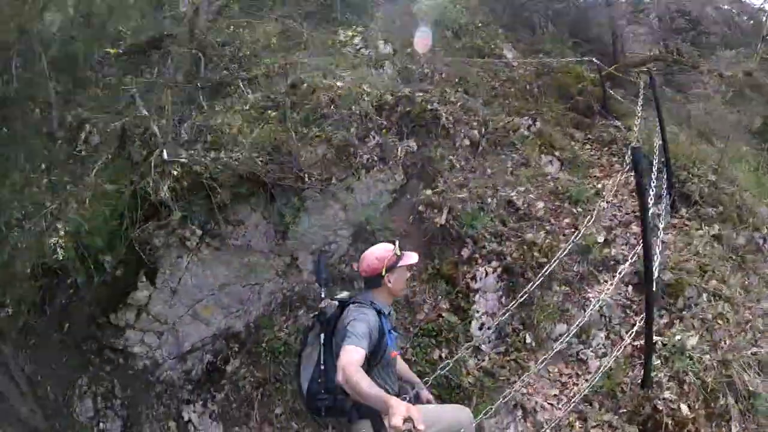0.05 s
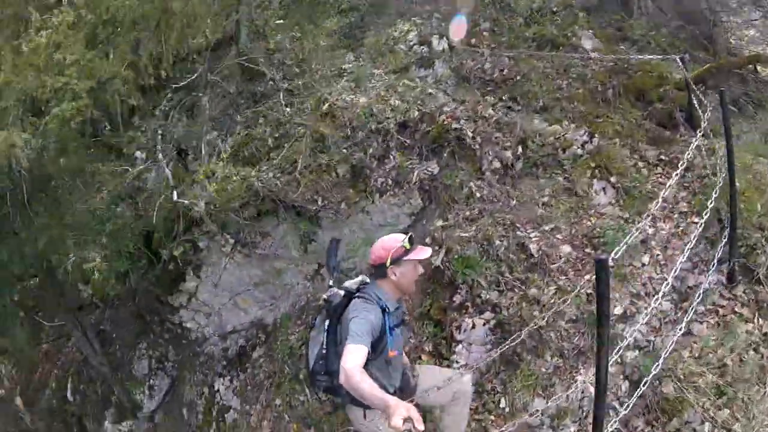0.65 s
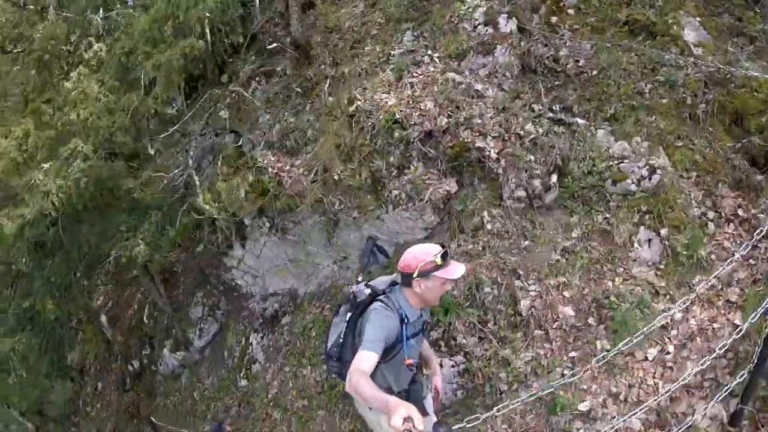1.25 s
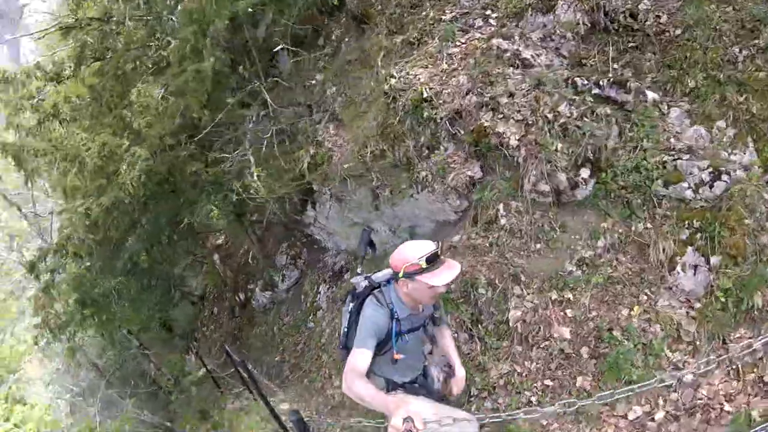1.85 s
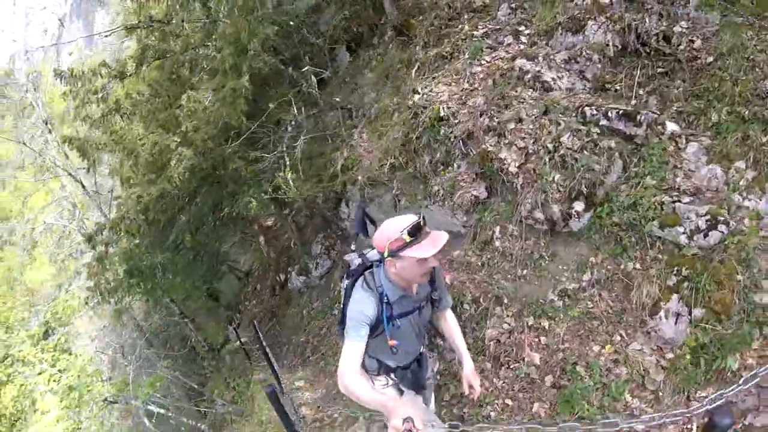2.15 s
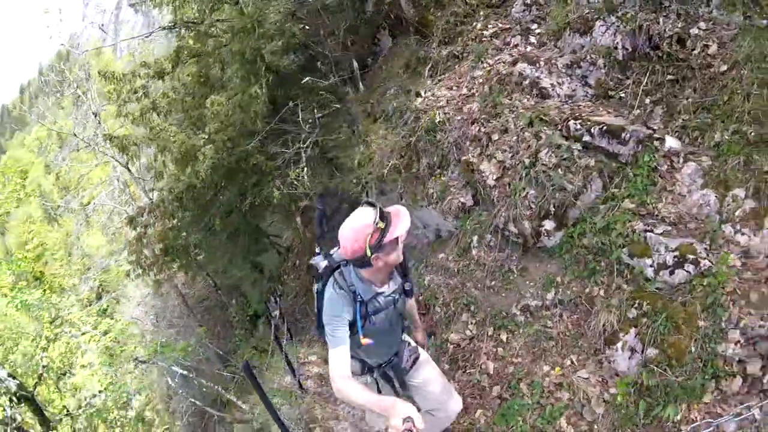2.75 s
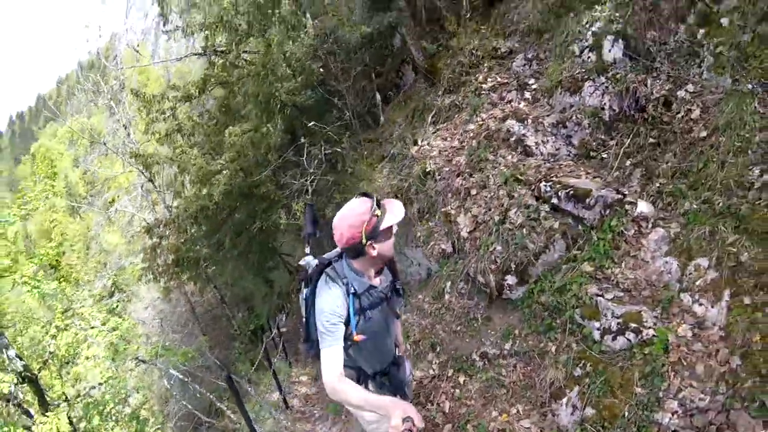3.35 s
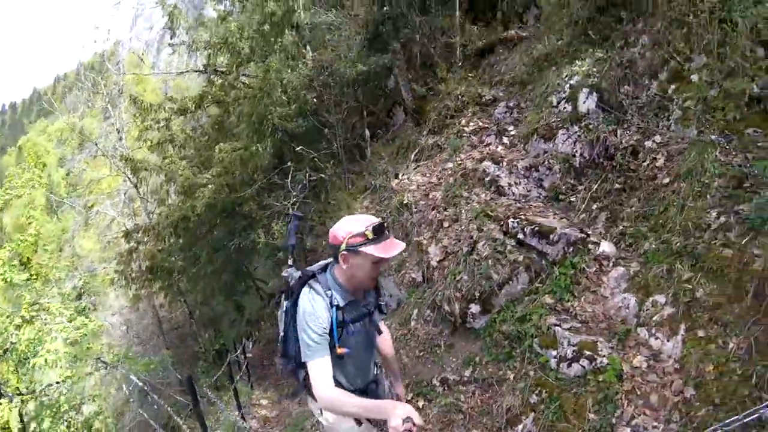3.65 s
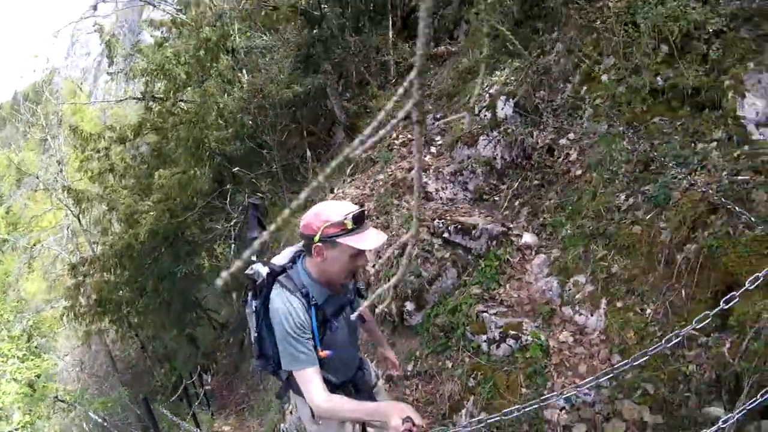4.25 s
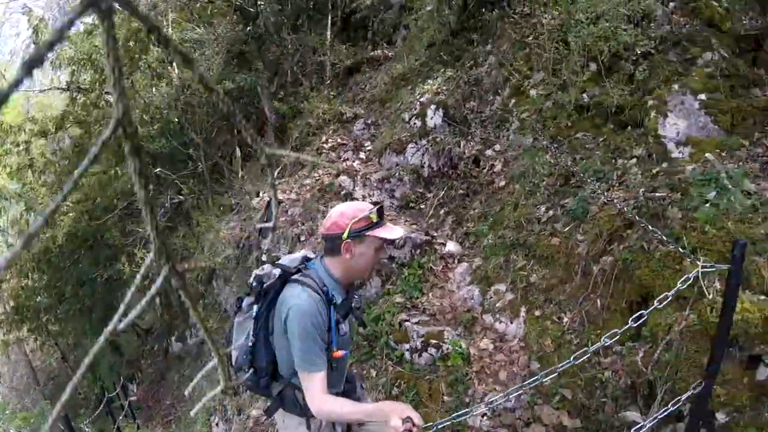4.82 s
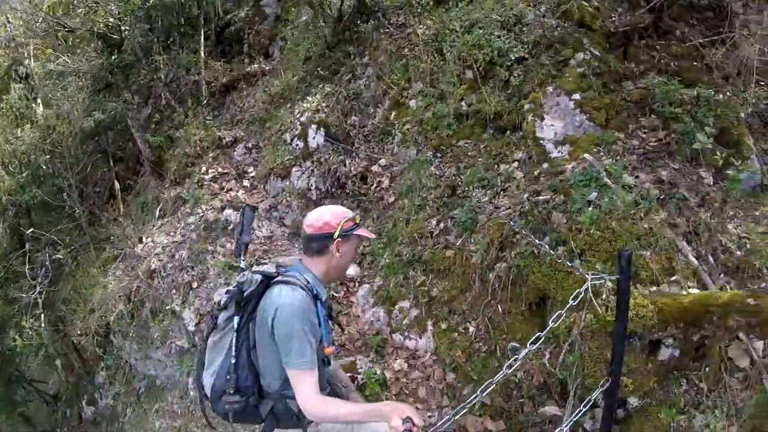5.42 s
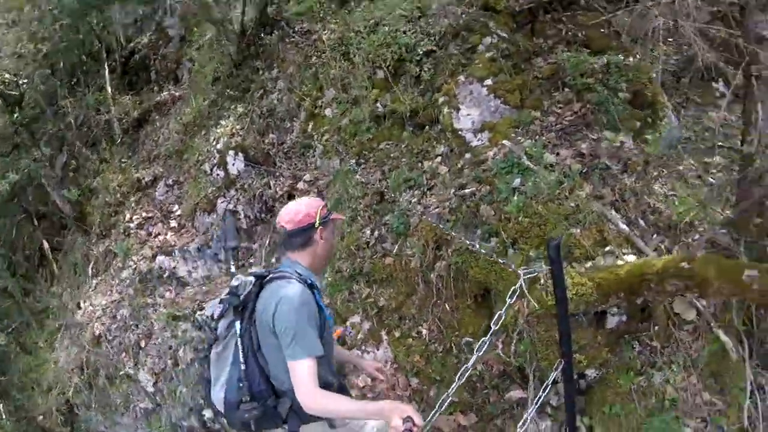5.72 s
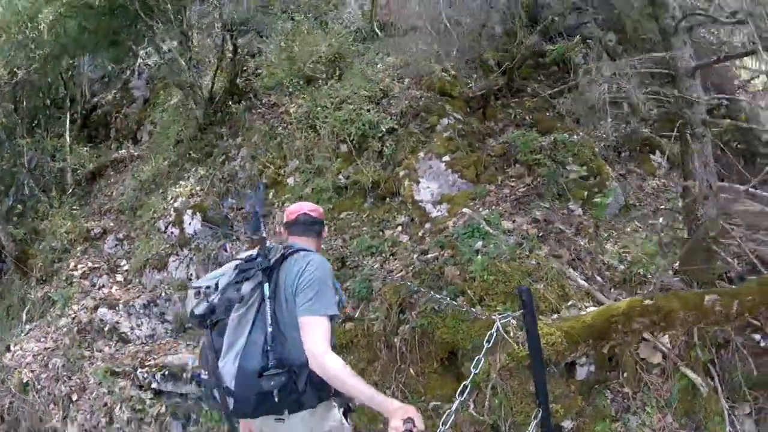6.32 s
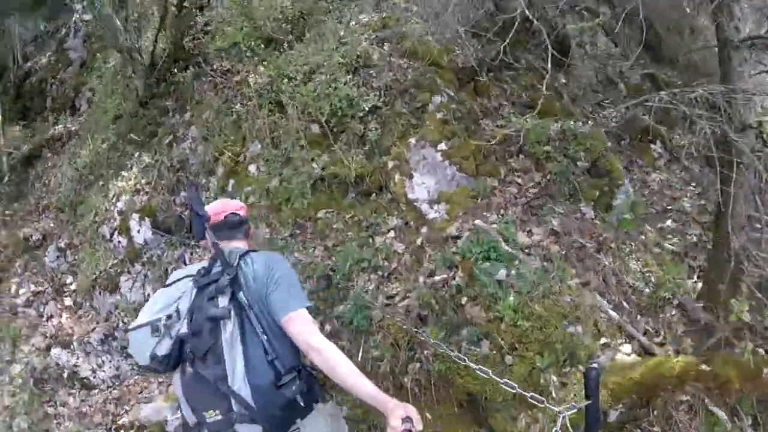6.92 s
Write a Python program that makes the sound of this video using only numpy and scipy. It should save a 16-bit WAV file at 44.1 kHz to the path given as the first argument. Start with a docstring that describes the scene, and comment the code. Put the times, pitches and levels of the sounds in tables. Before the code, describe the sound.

A gust buffets the microphone with a low, lumpy rumble, easing after about 1 second to a light breeze. A faint, airy outdoor hiss lies underneath. Throughout, boots scuff and crunch quietly and unevenly through dry leaves on a rocky forest path, with small snaps of twigs and grit, clearest near 0.9, 1.9 and 3 seconds. From about 3.4 to 4.1 seconds, branches and gear bump the camera pole, making several dull, very close thumps. Between 4.6 and 4.9 seconds comes the loudest moment, a quick cluster of hard clacks and short scrapes, and the hiss drops away. After a quieter step or two, a bright, scraping clatter arrives from 5.8 to 6.1 seconds, followed by a single duller knock at 6.3. Another leafy step follows, and soft knocking and rubbing on the pole finish it around 7 seconds.

```python
"""A hiker walks a rocky, leaf-strewn forest path, holding a small camera out on a pole.
At first a gust buffets the microphone over the faint hiss of the valley, while boots scuff dry leaves
and snap twigs and grit. The gust eases after a second; the steps go on. From 3.35 s branches and gear
knock on the pole, whose modes ring straight into the camera: dull thumps first, then from 4.6 s hard
clacks and scrapes, a bright clatter near 6 s and a last soft knocking and rubbing near 7 s."""
import sys
import numpy as np
from scipy import signal
from scipy.fft import rfft, irfft
from scipy.io import wavfile

SR = 44100
rng = np.random.default_rng(int(sys.argv[2]) if len(sys.argv) > 2 else 0)


def wrap_up_sound(samples):
    """Save the sound to the file named by the first command line argument, as 16-bit audio."""
    columns = np.atleast_2d(samples).T
    # keep every value between -1 and 1, then stretch to whole-number steps
    tamed = np.clip(columns, -1, 1)
    steps = np.round(tamed * 32767).astype(np.int16)
    wavfile.write(sys.argv[1], SR, steps)


N = 316638
TIME = np.arange(N) / SR


def amp(db):
    """Decibels to amplitude ratio."""
    return 10 ** (np.asarray(db) / 20)


def unit(x):
    """Normalisation to rms 1."""
    return x / np.sqrt(np.mean(x ** 2) + 1e-20)


def burst(x):
    """Normalisation to the energy of 10 ms at rms 1."""
    return x / np.sqrt(np.sum(x ** 2) * 100 / SR + 1e-20)


def curve(rows):
    """Linear interpolation of (t/s, value) rows."""
    return np.interp(TIME, *np.transpose(rows))


def colour(x, spectrum):
    """Spectral shaping by (f/Hz, level/dB) rows, to rms 1."""
    hz, db = np.transpose(spectrum)
    f = np.fft.rfftfreq(len(x), 1 / SR)
    gain = amp(np.interp(np.log(f + 1), np.log(hz), db))
    return unit(irfft(rfft(x) * gain, len(x)))


def lowpass(x, hz, order=2):
    """Causal low-pass filter."""
    return signal.sosfilt(signal.butter(order, min(hz, .45 * SR), fs=SR, output="sos"), x)


def highpass(x, hz, order=2):
    """Causal high-pass filter."""
    return signal.sosfilt(signal.butter(order, hz, "high", fs=SR, output="sos"), x)


def wander(hz):
    """Low-passed Gaussian fluctuation of rms 1."""
    return unit(lowpass(rng.standard_normal(N), hz))


def add(mix, s, sound):
    """Superposition of a sound starting at time s."""
    part = mix[max(round(s * SR), 0):][:len(sound)]
    part += sound[:len(part)]


# Course of the breeze at the microphone: t/s, relative level/dB
BREEZE_LEVELS = [(0.0, -37), (0.42, -42), (0.92, -36), (1.28, -47), (2.42, -51.5), (3.54, -50), (3.7, -45),
                 (4.84, -53), (5.2, -59), (6.14, -48), (7.18, -47.5)]
# Spectrum of its turbulence: f/Hz, relative level/dB
TURBULENCE_SPECTRUM = [(10, -6), (25, -1), (45, 0.5), (80, -9.5), (130, -12.5), (200, -18.5), (300, -32.5),
                       (600, -46.5), (2000, -83.5)]
# Strongest eddies of the gust: t/s, envelope peak level/dB
GUST_EDDIES = [(.047, -22.5), (.087, -22), (.128, -23.5), (.22, -24.5), (.324, -25.5), (.497, -26.5),
               (.641, -24), (.722, -19), (.792, -22.5), (.888, -23), (.913, -18), (1.006, -25.5),
               (1.101, -27.5), (1.523, -32.5)]
def wind(offset_db=1.52, lumpy_db=2.5, gust_db=-36, gust_hz=190, gust_share=0.27,
         eddy_s=0.0025, eddies_per_s=5.1, eddy_over_db=8, shed_above_db=-44):
    """Turbulent pressure at the port: a rumble that reaches higher in gusts, and swings of single eddies."""
    level_db = curve(BREEZE_LEVELS) + offset_db
    level = amp(level_db)
    slow = colour(rng.standard_normal(N), TURBULENCE_SPECTRUM)
    fast = unit(lowpass(rng.standard_normal(N), gust_hz, order=4))
    gust = gust_share * np.minimum(level / amp(gust_db), 1)
    out = level * (slow + gust * fast) * amp(lumpy_db * wander(hz=18))
    shed = (rng.random(N) < eddies_per_s / SR) & (level_db > shed_above_db)
    lesser_eddies = zip(TIME[shed], level_db[shed] + eddy_over_db)
    t = np.arange(-SR // 40, SR // 40) / SR
    for s, db in [*GUST_EDDIES, *lesser_eddies]:
        width = eddy_s * np.exp(0.23 * rng.standard_normal())
        # the pressure swings fastest as the core of the eddy passes
        phase = 2.1 * np.arcsinh(t / width) + rng.uniform(-1.2, 1.2)
        add(out, s + t[0], amp(db) * np.cos(phase) / np.cosh(t / width / 1.5))
    return out


# Spectrum of the valley hiss through the microphone port: f/Hz, relative level/dB
HISS_SPECTRUM = [(100, 9.5), (300, 5), (600, 1.5), (1000, -1.5), (2000, -5), (4000, -11.5), (5200, -9.5),
                 (6200, -7), (6550, 0.5), (7100, -7.5), (9000, -11.5), (11000, -17), (13000, -18.5),
                 (15000, -39)]
# Course of the hiss: t/s, level/dB
HISS_LEVELS = [(0, -56.5), (2.8, -57), (4.55, -56.5), (4.7, -69), (5.5, -61.5), (6.3, -61.5), (7.18, -58)]
def valley_hiss():
    """Broadband ambient noise, filtered by the response of the microphone port."""
    return colour(rng.standard_normal(N), HISS_SPECTRUM) * amp(curve(HISS_LEVELS))


def grains(per_s, size_db):
    """A Poisson train of impulses, mostly small and a few large."""
    sizes = amp(size_db * np.minimum(rng.exponential(1, N), 4))
    return unit(sizes * rng.choice([-1, 1], N) * (rng.random(N) < per_s / SR))


def crack(spectrum, decay_s, tail=0.0, tail_s=.015):
    """A noise transient with exponential decay and an optional tail of scattered sound."""
    t = np.arange(-64, 2048) / SR
    fade = (t >= 0) * (np.exp(-abs(t) / decay_s) + tail * np.exp(-t / tail_s))
    noise = colour(rng.standard_normal(len(t)) * fade, spectrum)
    return burst(noise[t > -.0002])


# Spectrum of cracking leaves and grit: f/Hz, relative level/dB
CRACKLE_SPECTRUM = [(200, -18.5), (500, -9.5), (1300, -8), (2000, -9), (3000, -5), (4000, -9.5),
                    (5000, -2.5), (6100, -2), (6550, 3.5), (7200, -5.5), (9000, -8.5), (11000, -22.5),
                    (14000, -45)]
# Footfalls: t/s, push level/dB, push half-duration/s, level of the rolling sole/dB
FOOTFALLS = [(0.014, -47.5, .04, -60.5), (0.376, -55.5, .035, -56.5), (0.904, -39, .017, -65),
             (0.944, -38.5, .011, -68.5), (1.697, -55.5, .05, -64), (1.911, -46.5, .016, -58),
             (3.07, -63, .04, -56), (3.758, -39.5, .025, -48), (4.756, -61.5, .02, -55.5),
             (5.151, -53.5, .065, -75.5), (5.644, -44, .03, -55.5), (6.49, -58, .07, -68),
             (6.735, -50, .04, -48)]
def leaf_steps(slide=0.47, roll_lag_s=0.15, roll_half_s=0.079, rest_db=-68, settle_db=-66.5):
    """Incoherent summation: tiny leaf cracks and the friction hiss of the sole swell with each step."""
    cracks = grains(per_s=4000, size_db=2.5)
    rustle = colour(cracks + slide * rng.standard_normal(N), CRACKLE_SPECTRUM)
    power = sum(push(s, db, half_s) + push(s + roll_lag_s, roll_db, roll_half_s)
                for s, db, half_s, roll_db in FOOTFALLS)
    level = np.sqrt(amp(rest_db) ** 2 + power)
    flutter = amp(wander(hz=60))
    # stray leaves tick as they settle, only loosely following the steps
    strays = grains(per_s=80, size_db=2.8)
    ticks = unit(signal.fftconvolve(strays, crack(CRACKLE_SPECTRUM, decay_s=.0008))[:N])
    return level * rustle * flutter + amp(settle_db) * unit(level ** 0.14) * ticks


def push(s, db, half_s):
    """Power envelope, sech squared, of one swell of pressure on the leaves."""
    return (amp(db) / np.cosh(np.minimum(1.15 * abs(TIME - s) / half_s, 20))) ** 2


# Twigs and grit breaking underfoot: t/s, level/dB, band centre f/Hz
FRACTURES = [(.056, -50.5, 800), (0.8627, -48, 5000), (1.044, -56.5, 6000), (1.246, -56, 6500),
             (1.912, -47.5, 3000), (2.349, -54.5, 4500), (2.762, -55, 444), (2.904, -54, 5200),
             (3.003, -40.5, 5600), (3.078, -45.5, 5500), (3.943, -44, 1170), (4.9886, -48, 7800),
             (5.068, -52.5, 5660)]
def snaps(decay_s=0.00059, tail=0.081, tail_s=0.02, half_width_octaves=0.85):
    """Brittle fracture: each snap is a band-limited transient, faintly scattered by the ground."""
    out = np.zeros(N)
    band_hz, band_db = np.transpose(CRACKLE_SPECTRUM)
    for s, db, hz in FRACTURES:
        rolloff_db = 10 * np.log10(1 + (np.log2(band_hz / hz) / half_width_octaves) ** 6)
        spectrum = np.c_[band_hz, band_db - rolloff_db]
        add(out, s, amp(db) * crack(spectrum, decay_s, tail, tail_s))
    return out


SHAFT_TOP_HZ, HOUSING_TOP_HZ = 450, 4200  # modes above these belong to the next smaller part
# Normal modes of the pole with the camera on it: f/Hz, relative level/dB, T60/s
POLE_MODES = [(66.6, -3, 0.13), (123.7, -1, 0.15), (200.4, -1, 0.11), (263.5, -1.5, 0.074),
              (398, -10, 0.065), (635.4, -15.5, 0.075), (692, 0, 0.023), (938, -1.5, 0.013),
              (1295, -5.5, 0.035), (1600, 1.5, 0.02), (1930, -7, 0.02), (2130, -0.5, 0.015),
              (2410, 4, 0.0054), (2910, -2.5, 0.012), (3830, 5.5, 0.014), (4760, 1.5, .009),
              (5090, 1, 0.0083), (6510, 4.5, 0.0064), (7650, -11.5, 0.0067), (9550, -10.5, .008)]
def pole_rings(rise_cycles=0.22, housing_hz=520, fittings_hz=3000, top_hz=8000):
    """Modal impulse responses of shaft, housing and fittings; each contact point weights the modes anew."""
    hz, db, t60 = np.transpose(POLE_MODES)[:, :, None]
    t = np.arange(SR // 4) / SR
    spread_db, detune, phase = (rng.normal(0, sigma, hz.shape) for sigma in (1.2, .008, 3))
    # bending waves travel along the pole before each mode stands
    rise = 1 - np.exp(-hz * t / rise_cycles)
    decay = amp(db + spread_db - 60 * t / t60)
    modes = rise * decay * np.sin(2 * np.pi * hz * (1 + detune) * t + phase)
    part = np.digitize(hz[:, 0], [SHAFT_TOP_HZ, HOUSING_TOP_HZ])
    shaft, housing, fittings = (modes[part == k].sum(0) for k in range(3))
    # the smaller parts pass on little below their own modes
    housing = highpass(housing, housing_hz, order=4)
    fittings = lowpass(highpass(fittings, fittings_hz), top_hz, order=4)
    return shaft, housing, fittings


def partition(db, hard_hz, even_hz=1380):
    """Energy partition as gains of shaft and housing: softer contact gives more to the shaft."""
    shaft_share = 1 / (1 + (hard_hz / even_hz) ** 4.2)
    return amp(db) * np.sqrt([shaft_share, 1 - shaft_share])


# Blows on the pole: t/s, level/dB, contact hardness as a bandwidth f/Hz, fittings level/dB
IMPACTS = [(3.35, -42, 416, -70), (3.531, -31, 587, -80), (3.565, -21.5, 417, -80),
           (3.833, -24.5, 580, -50), (3.959, -27.5, 428, -67), (4.123, -38, 794, -54.5),
           (4.5804, -35, 1490, -58), (4.604, -39, 1600, -73), (4.6634, -14, 1650, -33.5),
           (4.7836, -21, 3060, -45), (4.7869, -11.5, 1400, -44), (4.817, -28, 2380, -65),
           (4.8253, -21.5, 1750, -58), (4.862, -25.5, 790, -66), (5.8175, -36, 2600, -36.5),
           (5.824, -38, 2370, -44), (5.922, -29, 1110, -31), (5.9742, -28.5, 2270, -58),
           (5.9954, -28.5, 2370, -43), (6.0187, -38, 2510, -47), (6.029, -35, 3000, -43),
           (6.037, -48, 2500, -31.5), (6.0505, -29, 1170, -25.5), (6.2539, -25.5, 864, -59),
           (7.033, -35, 488, -63), (7.084, -36, 690, -71)]
def knocks(chatter_s=.003, crack_db=-13, crack_s=0.00076, jolt_s=0.0017, jolt_lag_s=.003, soft_hz=500):
    """Impact excitation: a push and brief chatter ring the modes, the brighter the harder the contact."""
    out = np.zeros(N)
    t = np.arange(SR // 25) / SR
    u = t / jolt_s
    jolt = burst(highpass(u ** 2 * (3 - u) * np.exp(-u), hz=45))
    for s, db, hard_hz, ring_db in IMPACTS:
        thump, clack = partition(db, hard_hz)
        chatter = rng.standard_normal(len(t)) * np.exp(-t / chatter_s)
        force = signal.unit_impulse(len(t)) + .4 * chatter / np.linalg.norm(chatter)
        shaft, housing, fittings = (signal.fftconvolve(force, ring) for ring in pole_rings())
        shaft = lowpass(shaft, min(0.39 * hard_hz, SHAFT_TOP_HZ), order=3)
        housing = highpass(lowpass(housing, hard_hz, order=3), 0.3 * hard_hz)
        add(out, s, thump * burst(shaft) + clack * burst(housing) + amp(ring_db) * burst(fittings))
        add(out, s, amp(ring_db + crack_db) * crack(CRACKLE_SPECTRUM, crack_s))
        # a moment later the whole pole jolts once in the hand, most after a soft blow
        add(out, s + jolt_lag_s, thump * np.sqrt(soft_hz / hard_hz) * jolt)
    return out


# Rubbing on the pole: start t/s, end t/s, level/dB, contact hardness f/Hz, fittings level/dB
RUBS = [(4.614, 4.642, -47.5, 1650, -85), (4.671, 4.686, -28, 1830, -64), (4.79, 4.845, -27.5, 1170, -55),
        (4.852, 4.879, -31, 1300, -65), (5.961, 6.027, -33.5, 836, -43.5), (6.018, 6.082, -33, 910, -35.5),
        (6.397, 6.473, -56, 1000, -71), (7.01, 7.182, -52, 1100, -80)]
def scrapes(slips_per_s=1000, grit_db=2, grit_hz=5200, lowest_hz=212):
    """Stick-slip friction: a shower of small gritty impulses drives the modes of the pole."""
    out = np.zeros(N)
    for start, end, db, hard_hz, ring_db in RUBS:
        inside = (TIME > start) & (TIME < end)
        catches = rng.standard_normal(N) * (rng.random(N) < slips_per_s / SR)
        even_rub = 0.031 * rng.standard_normal(N)
        force = (catches + even_rub)[inside] * signal.windows.tukey(inside.sum(), .3)
        shaft, housing, fittings = map(burst, pole_rings())
        grit = lowpass(crack(CRACKLE_SPECTRUM, decay_s=0.0005), grit_hz, order=3)
        add(fittings, 0, amp(grit_db) * burst(grit))
        shaft = highpass(shaft, lowest_hz, order=6)  # rubbing is too light to stir the lowest bends
        housing = lowpass(housing, hard_hz, order=3)
        gains = [*partition(db, hard_hz), amp(ring_db)]
        for gain, ring in zip(gains, (shaft, housing, fittings)):
            rub = signal.fftconvolve(force, ring)
            add(out, start, gain * rub * np.sqrt(len(force) / np.sum(rub ** 2)))
    return out


def scene():
    """Linear superposition of structure-borne and airborne sound at one microphone."""
    return (knocks() + scrapes() + leaf_steps() + snaps() + valley_hiss() + wind())[None]


def record(dry):
    """Band limiting: the camera acts as a linear-phase low-pass filter at 14.5 kHz."""
    kernel = signal.firwin(255, 14500, window=("kaiser", 8), fs=SR)
    return signal.oaconvolve(dry, kernel[None], "same")


dry = scene()
out = record(dry)
wrap_up_sound(out)
```